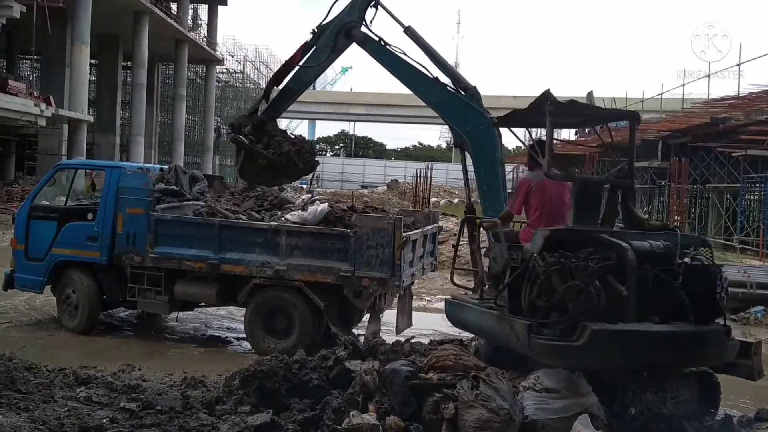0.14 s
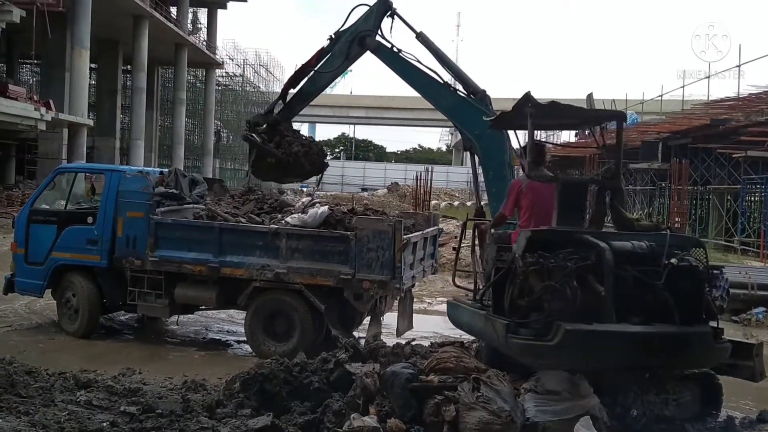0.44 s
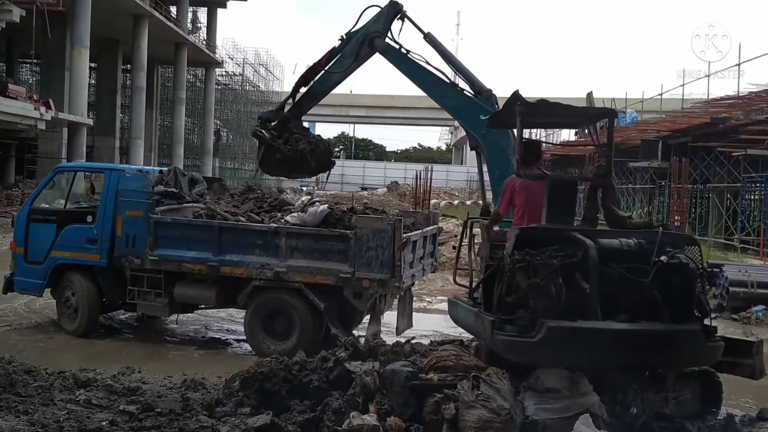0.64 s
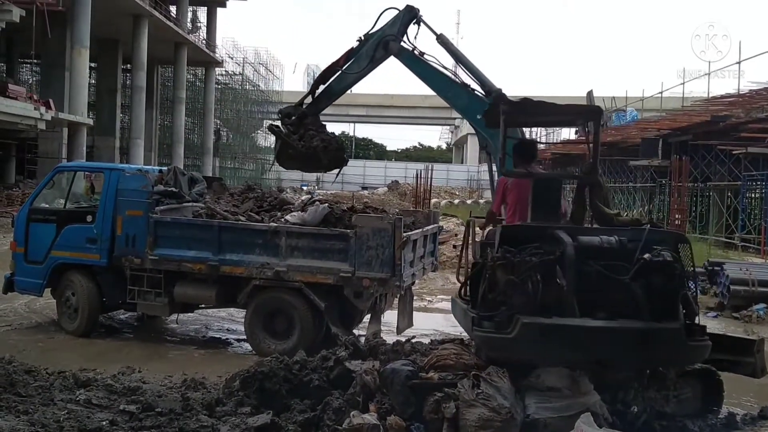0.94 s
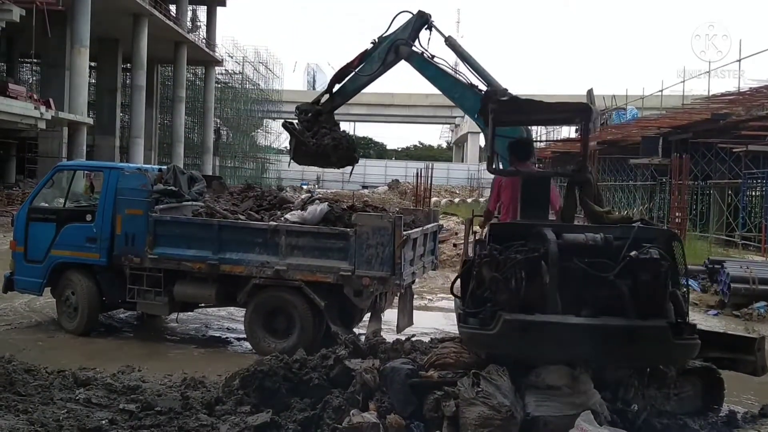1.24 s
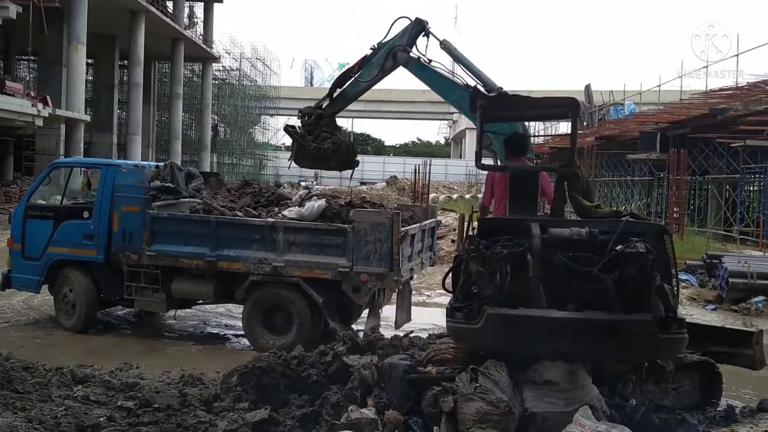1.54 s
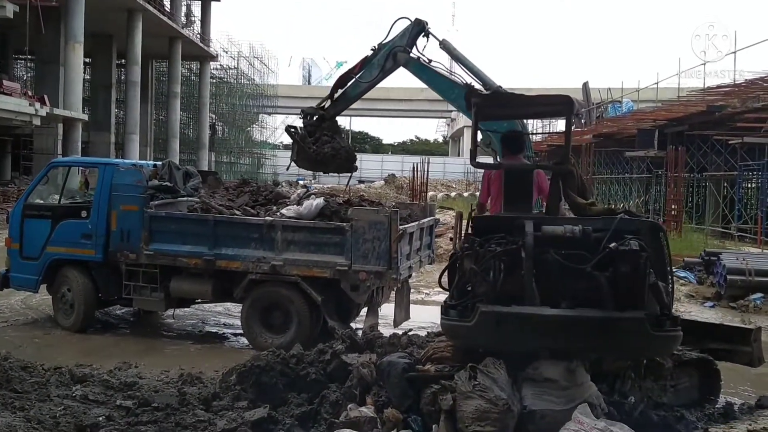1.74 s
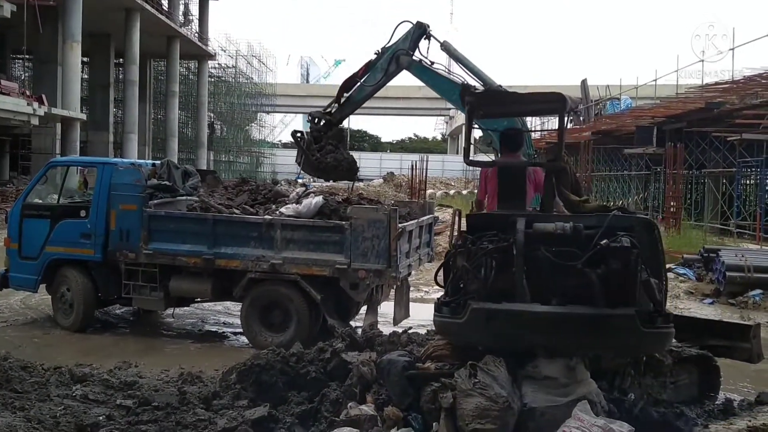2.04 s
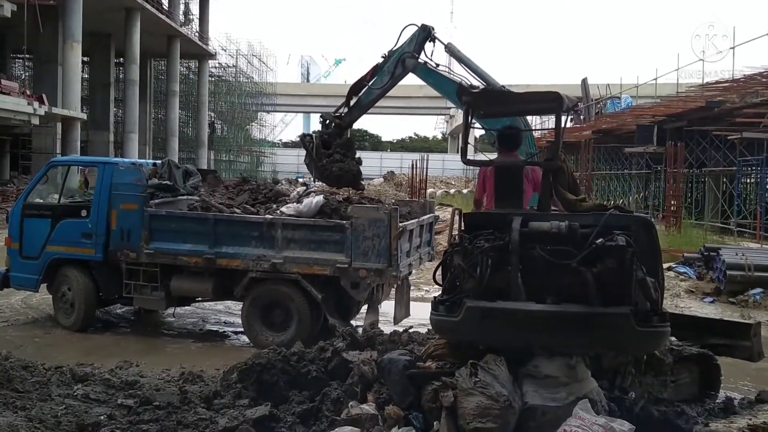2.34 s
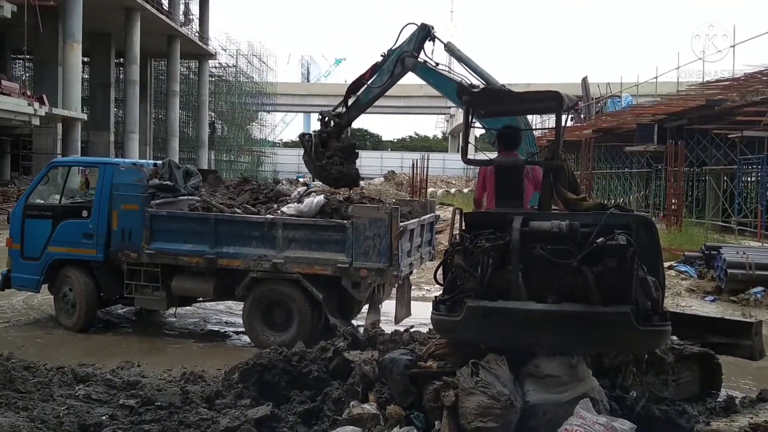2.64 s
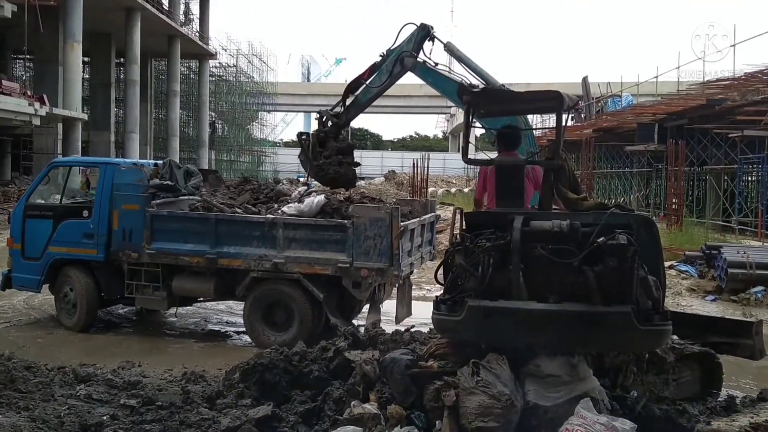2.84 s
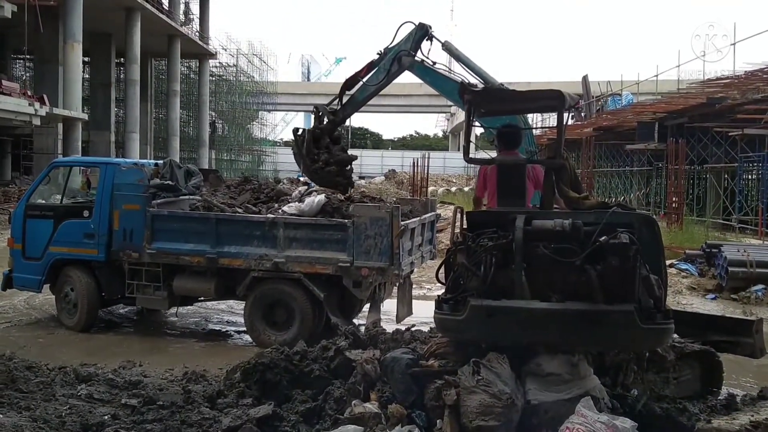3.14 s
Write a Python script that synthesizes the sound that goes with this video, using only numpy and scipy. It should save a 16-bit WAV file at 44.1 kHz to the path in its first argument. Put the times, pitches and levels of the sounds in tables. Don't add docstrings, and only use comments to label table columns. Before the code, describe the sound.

A small excavator's diesel engine clatters hard and steadily while scrap clunks in its bucket.

```python
import sys
import numpy as np
from scipy import signal
from scipy.fft import rfft, irfft, next_fast_len
from scipy.io import wavfile
from scipy.ndimage import uniform_filter1d

SR = 44100
rng = np.random.default_rng(int(sys.argv[2]) if len(sys.argv) > 2 else 0)


def gain_from_decibels(decibels):
    exponent = np.asarray(decibels, float) / 20
    return 10 ** exponent


def log_audio(samples):
    frames = np.atleast_2d(samples).T
    limited = np.clip(frames, -1, 1)
    pcm = np.round(limited * 32767).astype(np.int16)
    wavfile.write(sys.argv[1], SR, pcm)


N = 145530

# start_s, clatter_level_db, tick_over_clatter_db, brightness_db
ENGINE_LOAD = [(0, -32.5, 7, 1), (.15, -28, -18, 2.5), (.45, -30, -5, 2), (.8, -29.5, -6, 2.5),
               (.95, -31.5, 3.5, 0.5), (1.35, -29, 0, 1.5), (1.6, -28, -11, 0.5), (1.9, -31.5, -8.5, 2.5),
               (2.1, -29, -4.5, -4), (2.6, -28.5, -9.5, -5.5), (3.05, -27.5, -4, -2), (3.17, -29, -3, -3),
               (3.3, -48.5, -3, -5)]


def unit(x):
    return x / np.sqrt(np.mean(x ** 2) + 1e-20)


def along(points, hz):
    point_hz, value = np.transpose(points)
    return np.interp(np.log(hz + 1), np.log(point_hz + 1), value)


def curves(rows):
    time_s, *columns = np.transpose(rows)
    return [np.interp(np.arange(N) / SR, time_s, column) for column in columns]


def ramp(start_s, length_s):
    return np.clip((np.arange(N) / SR - start_s) / length_s, 0, 1)


def peaks(rows, hz):
    return sum(gain_from_decibels(2 * db) / (1 + (2 * (hz - centre) / width) ** 2) ** 2 for centre, width, db in rows)


def coloured(x, gain):
    size = 2 * next_fast_len(N // 2 + 4096)
    cepstrum = irfft(np.log(gain(np.fft.rfftfreq(size, 1 / SR)) + 1e-6), size)
    cepstrum[1:size // 2] *= 2
    cepstrum[size // 2 + 1:] = 0
    return irfft(rfft(x, size) * np.exp(rfft(cepstrum)), size)[:N]


def noise(gain):
    return unit(coloured(rng.standard_normal(N), gain))


def patches(shape, frames):
    field = uniform_filter1d(rng.standard_normal(shape), size=2, axis=0)
    return unit(uniform_filter1d(field, size=frames, axis=1))


def firings():
    # start_s, firing_rate_hz
    engine_speed = [(0.0, 44.73), (0.4, 43.8), (0.8, 45.16), (0.95, 45.54), (1.15, 46.86), (1.45, 45.79),
                    (1.8, 46.01), (2.0, 47.29), (2.2, 48.6), (2.4, 48.25), (2.6, 49.15), (2.9, 48.3),
                    (3.3, 48.35)]
    first_firing = 0.2
    return first_firing + np.cumsum(curves(engine_speed)[0]) / SR


def clatter():
    # start_firings, swell_db
    bursts = [
        (.56, 4),
        (1.58, 2),
        (2.59, 2),
    ]
    # centre_hz, width_hz, level_db
    flank = [(1483, 99, 4.5), (1860, 380, -2), (2385, 54, 3), (2876, 29, -2), (3110, 48, -7.5),
             (4044, 90, -9.5), (4250, 80, -11.5), (4864, 110, -12.5), (5530, 52, -12.5), (6180, 95, -15.5)]
    quarter = [(1560.5, 54, 7), (1876, 510, 2), (2336, 84, -0.5), (2953, 82, -1), (4035, 330, -11),
               (5130, 78, -12.5), (5540, 68, -19.5), (6113, 120, -14)]
    rear = [(1613, 55, 6), (1771, 128, 1.5), (2341, 84, 6), (2906, 115, -2), (3210, 83, -8.5),
            (3394, 87, -13.5), (4058, 205, -9.5), (4655, 25, -26), (5350, 110, -18), (5310, 79, -15),
            (5600, 48, -10.5), (6182, 61, -15)]
    # frequency_hz, level_db
    panel_fill = [(1000, -12.5), (2500, -4.5), (3400, -20), (4100, -24.5), (4700, -27.5), (5700, -16),
                  (6700, -35), (9900, -60.5), (11500, -90.5)]
    side_fill_db = [0, -2, -3.5]
    burst_width = 0.17
    top_from_hz, top_swell_share = 4400, 0.3
    late_below_hz, late_s = 2050, 0.005
    first_turn_s, second_turn_s, turn_length_s = 0.935, 1.983, 0.15

    turn = firings()
    chance = rng.standard_normal((int(turn[-1]) + 3, 3))
    swell = np.ones(N)
    for start, db in bursts:
        since = (turn - start) % 3
        cycle = ((turn - start) // 3 + 1).astype(int)
        size = gain_from_decibels(db + 0.8 * chance[cycle, int(start)])
        swell += size * np.exp(-(since / burst_width - 2) ** 2)
    late_swell = np.roll(swell, round(late_s * SR))

    def low(hz):
        return 1 / (1 + (hz / top_from_hz) ** 8)

    def late(hz):
        return 1 / (1 + (hz / late_below_hz) ** 16)

    air = rng.standard_normal((3, N))
    drive = coloured(unit(swell) * air[0], lambda hz: np.sqrt(low(hz) * (1 - late(hz))))
    drive += coloured(unit(late_swell) * air[2], lambda hz: np.sqrt(late(hz)))
    drive += coloured(unit(swell ** top_swell_share) * air[1], lambda hz: np.sqrt(1 - low(hz)))

    to_quarter = ramp(first_turn_s - turn_length_s / 2, turn_length_s)
    to_rear = ramp(second_turn_s - turn_length_s / 2, turn_length_s)
    shares = [1 - to_quarter, to_quarter - to_rear, to_rear]
    ring = np.zeros(N)
    for share, panels, fill_db in zip(shares, [flank, quarter, rear], side_fill_db):
        def panel_gain(hz):
            return np.sqrt(peaks(panels, hz) + gain_from_decibels(2 * (fill_db + along(panel_fill, hz))))
        ring += np.sqrt(np.abs(share)) * unit(coloured(drive, panel_gain))
    return gain_from_decibels(curves(ENGINE_LOAD)[0]) * ring


def suppressed(x):
    # frequency_hz, depth_db
    patch_depth = [(1200, 1), (2600, 2), (3600, 5), (5000, 6), (8000, 11)]
    # frequency_hz, threshold_rms
    patch_threshold = [(3000, -.4), (6000, 0), (8000, 1.2)]
    # frequency_hz, share
    bright_share = [(2800, 0), (4500, 0.5), (9000, 4.5)]
    # start_s, edge_hz
    lower_edge = [(0, 1340), (.9, 1286), (1.05, 1400), (1.55, 1470), (1.62, 1186), (1.9, 1320),
                  (2.15, 1430), (3.3, 1447)]
    # start_s, length_s, centre_hz, gain_db
    held_bands = [(0.12, 0.1, 1166, 27.5), (0.517, 0.32, 1650, -7), (0.622, 0.343, 3174, 9),
                  (1.24, 0.43, 3090, -10.5), (1.654, 0.46, 3040, 5), (1.19, 0.58, 12000, 14),
                  (0.18, 0.57, 3260, -14), (2.36, 0.13, 2180, -7), (0.263, 0.3, 1500, 2.5),
                  (0.16, 0.26, 4500, 13.5), (0.045, 0.23, 5440, 8), (7.1, 0.52, 3650, -4),
                  (2.55, .3, 3500, -9), (4.8, 0.13, 4600, -16), (0.86, 0.28, 4400, -16),
                  (1.03, 0.49, 4300, -13), (1.5, .26, 4650, -20), (2.5, .1, 3300, -18),
                  (1.25, 0.26, 3600, -15)]
    # start_s, length_s, centre_hz, gain_db
    open_streaks = [(0.024, 1.01, 8400, 19), (.68, .28, 9040, 18), (.28, 0.16, 7230, 23),
                    (.26, .22, 11000, 6), (.12, .23, 7100, 8), (2.15, 0.36, 5650, 2), (2.04, .42, 6080, 6),
                    (2.63, 0.223, 6050, 7), (3.1, 0.2, 6080, 12), (1.8, 0.8, 3600, 8.5),
                    (3.2, .43, 5900, 3), (2.5, 0.23, 4620, 13.5), (3.4, .18, 5400, 18),
                    (3.1, .2, 4600, 16.5), (3.1, 0.082, 7200, 21), (3.17, 0.11, 5650, 9),
                    (1.55, 0.24, 10000, 21), (2.1, 0.575, 4130, 3.5), (1.62, 0.365, 4100, 1)]
    edge_db, edge_steep_hz = -30.5, 22
    band_width_hz, streak_width_hz, fade_s = 333, 157, 0.026

    hz, t, z = signal.stft(x, SR, nperseg=512)
    bin_hz = hz[:, None]
    opening = np.tanh(1.07 * (patches(z.shape, 13) - along(patch_threshold, bin_hz)))
    gain = gain_from_decibels(along(patch_depth, bin_hz) * opening)
    gain /= np.sqrt(uniform_filter1d(np.mean(gain ** 2, axis=1, keepdims=True), size=21, axis=0))
    brightness_db = np.interp(t, *np.transpose(ENGINE_LOAD)[[0, 3]])
    db = 20 * np.log10(gain) + along(bright_share, bin_hz) * brightness_db

    above_edge = (bin_hz - np.interp(t, *np.transpose(lower_edge))) / edge_steep_hz
    db = db + edge_db / (1 + np.exp(np.clip(above_edge, -50, 50)))

    for rows, width_hz in [(held_bands, band_width_hz), (open_streaks, streak_width_hz)]:
        for start_s, length_s, centre_hz, gain_db in rows:
            held = np.clip(np.minimum(t - start_s, start_s + length_s - t) / fade_s, 0, 1)
            share = held * np.exp(-(2 * (bin_hz - centre_hz) / width_hz) ** 4)
            db = db + share * (gain_db - np.clip(db, -25, 25) * (centre_hz > 2600))
    return signal.istft(z * gain_from_decibels(db), SR, nperseg=512)[1][:N]


def ticks():
    # place_firings, level_db
    cycle_ticks = [
        (.08, -10),
        (.86, -3),
        (1.12, -8),
        (1.88, 0),
        (2.1, -10),
        (2.88, -8),
    ]
    # frequency_hz, level_db
    tick_colour = [(1100, -65), (1500, 0.5), (1900, 7), (2600, -5), (3300, -30), (4100, -12), (6000, -92)]
    peak_db, scatter_db, jitter_s = 12, 1.3, 0.0002

    turn = firings()
    level_db, tick_db, _ = curves(ENGINE_LOAD)
    blows = np.zeros(N)
    cycle = np.arange(int(turn[-1] / 3))
    chance = rng.standard_normal((len(cycle), len(cycle_ticks), 2))
    for k, (place, db) in enumerate(cycle_ticks):
        at = np.interp(3 * cycle + place, turn, np.arange(N)) + jitter_s * SR * chance[:, k, 0]
        at = np.clip(at.astype(int), 0, N - 1)
        blows[at] += gain_from_decibels(db + tick_db[at] + scatter_db * chance[:, k, 1])

    def click(hz):
        return gain_from_decibels(along(tick_colour, hz))

    click_peak = np.abs(coloured(np.arange(N) == 0, click)).max()
    return gain_from_decibels(level_db + peak_db) * coloured(blows, click) / click_peak


def exhaust():
    orders = np.array([4, 6, 9, 18]) / 3
    orders_db = [-85, -67.5, -73, -69.5]
    # frequency_hz, level_db
    rumble_colour = [(20, -67), (90, -9), (150, -21), (280, -4.5), (540, -16), (700, -7), (1300, -12.5),
                     (2200, -41)]
    # start_s, level_db
    rumble_level = [(0, -51.5), (1.2, -55.5), (3.3, -58.5)]

    turn = firings()
    tones = np.zeros(N)
    for order, db in zip(orders, orders_db):
        tones += np.sqrt(2) * gain_from_decibels(db) * np.sin(2 * np.pi * order * turn)
    rumble = noise(lambda hz: gain_from_decibels(along(rumble_colour, hz)))
    return tones + gain_from_decibels(curves(rumble_level)[0]) * rumble


def clunks():
    # start_s, peak_db, pitch_hz
    knocks = [(0, -37.5, 994), (.256, -37, 751), (.401, -41, 741), (.465, -37.5, 772), (0.608, -38, 1036),
              (.71, -36.5, 857), (0.77, -37.5, 980), (.875, -38, 784), (0.979, -42, 1040),
              (1.073, -46, 820), (1.204, -38.5, 830), (1.266, -40.5, 825), (1.693, -44.5, 930),
              (1.754, -40.5, 1000), (1.9, -39, 913), (1.963, -41, 985), (2.022, -35.5, 838),
              (2.653, -45.5, 960), (2.964, -41.5, 717), (3.086, -42.5, 998), (.005, -43.5, 284),
              (.07, -48, 678), (.115, -50, 710), (.242, -45.5, 400), (.322, -50, 283), (.334, -45.5, 684),
              (0.496, -45, 263), (.563, -50, 266), (.665, -48, 290), (1.107, -48.5, 1033),
              (1.277, -56, 414), (1.496, -47, 854), (1.655, -45, 840), (2.394, -51.5, 990),
              (2.473, -51, 967), (2.596, -50.5, 996), (2.691, -51, 755), (2.823, -51.5, 695),
              (3.215, -48, 854), (3.254, -49, 665), (3.284, -45, 626)]
    rise_s, fall_s, width_hz, trim_db = 0.0038, 0.015, 55.6, -6

    out = np.zeros(N + SR)
    t = np.arange(SR // 5) / SR
    shape = (1 - np.exp(-t / rise_s)) ** 2 * np.exp(-(t / fall_s / 2) ** 2)
    for start_s, db, hz in knocks:
        drift = uniform_filter1d(rng.standard_normal(len(t)), size=200)
        wander = np.cumsum(drift) * width_hz * 14 / SR
        knock = gain_from_decibels(db + trim_db) * 2 * shape * np.sin(2 * np.pi * (hz * t + wander))
        out[round(start_s * SR):][:len(t)] += knock
    return out[:N]


def hiss():
    # frequency_hz, level_db
    hiss_colour = [(5500, -19.5), (7000, 2.5), (9700, -23), (11600, -0.5), (15400, -7)]
    # frequency_hz, level_db
    fleck_gain = [(7000, 2), (9500, 7), (11500, 5), (13000, 1.5)]
    level_db = -68

    hz, _, z = signal.stft(noise(lambda hz: gain_from_decibels(along(hiss_colour, hz))), SR, nperseg=512)
    flecks = gain_from_decibels(along(fleck_gain, hz)[:, None] * patches(z.shape, 9))
    return gain_from_decibels(level_db) * signal.istft(z * flecks, SR, nperseg=512)[1][:N]


def scrape():
    # start_s, level_db
    scrape_level = [
        (.52, -52),
        (.6, -37.5),
        (.67, -33),
        (.76, -38.5),
        (.83, -50),
    ]
    # centre_hz, width_hz, level_db
    bucket_body = [(710, 35, 3), (830, 140, 2.5), (1000, 89, 4)]

    before = [(0, -90), (scrape_level[0][0] - 0.02, -90)]
    after = [(scrape_level[-1][0] + 0.022, -90)]
    level_db, = curves([*before, *scrape_level, *after])
    return gain_from_decibels(level_db - 6.5) * noise(lambda hz: np.sqrt(peaks(bucket_body, hz)))


def groan():
    # start_s, pitch_hz, level_db
    groan_path = [
        (1.74, 700, -52.5),
        (1.9, 707.5, -45),
        (2, 700, -44.5),
        (2.08, 685, -37),
        (2.18, 683, -44.5),
        (2.28, 687, -52.5),
    ]
    flutter_hz = 42

    pitch_hz, level_db = curves(groan_path)
    on = ramp(groan_path[0][0], 0.011) * (1 - ramp(groan_path[-1][0] - 0.03, 0.016))

    def slow(hz):
        return 1 / (1 + (hz / flutter_hz) ** 4)

    phase = 2 * np.pi * np.cumsum(pitch_hz) / SR
    main = (1 + 0.5 * noise(slow)) * np.sin(phase + 0.55 * noise(slow))
    neighbour = 0.7 * noise(slow) * np.sin(1.075 * phase)
    return on * gain_from_decibels(level_db) * (main + neighbour)


def clanks():
    # start_s, peak_db
    strikes = [
        (2.5716, -14.5),
        (3.0129, -16.5),
    ]
    ring_hz, t60_s, rise_s = 1836, 0.086, 0.0014

    out = np.zeros(N + SR)
    t = np.arange(SR // 5) / SR
    for start_s, db in strikes:
        fall = gain_from_decibels(db - 2 - 60 * t / t60_s)
        rise = 1 - np.exp(-t / rise_s)
        out[round(start_s * SR):][:len(t)] += fall * rise * np.sin(2 * np.pi * ring_hz * t)
    return out[:N]


def next_shot():
    # centre_hz, width_hz, level_db
    next_body = [(657, 61, -10.5), (315, 120, -10), (2286, 85, 10), (3030, 550, 1), (3840, 360, -5),
                 (6800, 120, -9.5), (7400, 120, -12.5), (7640, 110, -7.5), (8100, 110, -12),
                 (8600, 120, -14.5), (9480, 99, -27)]
    # frequency_hz, level_db
    next_fill = [(300, -29), (3000, -24), (5000, -34), (8000, -30), (10000, -36), (15000, -33.5)]
    dissolve_s, dissolve_length_s, level_db = 3.17, 0.095, -34

    sound = noise(lambda hz: np.sqrt(peaks(next_body, hz) + gain_from_decibels(2 * along(next_fill, hz))))
    return gain_from_decibels(level_db) * ramp(dissolve_s, dissolve_length_s) ** 1.9 * sound


def scene():
    engine = suppressed(clatter()) + ticks() + exhaust()
    bucket = clunks() + scrape() + clanks()
    return (engine + bucket + hiss() + groan() + next_shot())[None]


def band_limit(x):
    return signal.sosfilt(signal.butter(12, 15370, fs=SR, output="sos"), x)


def record(dry):
    top_hz = 15480
    spectrum = rfft(dry) * (np.fft.rfftfreq(N, 1 / SR) < top_hz)
    return band_limit(irfft(spectrum, N))


dry = scene()
out = record(dry)
log_audio(out)
```